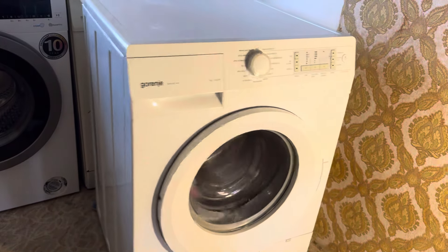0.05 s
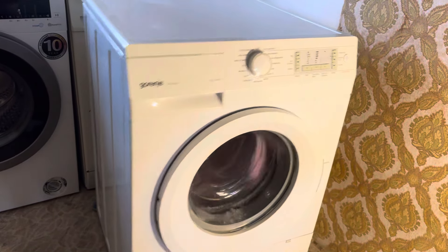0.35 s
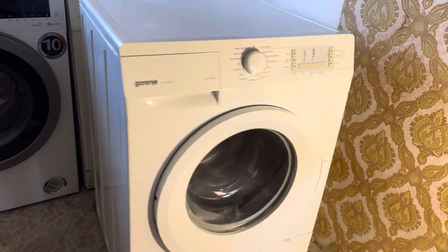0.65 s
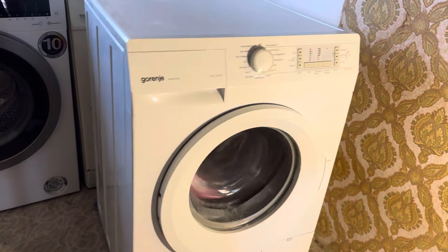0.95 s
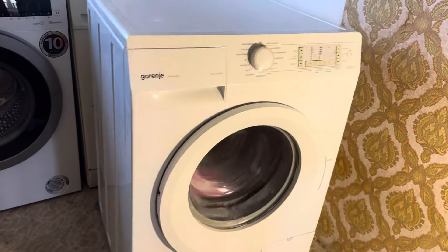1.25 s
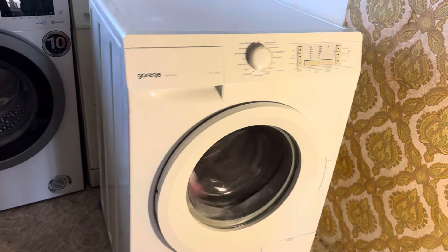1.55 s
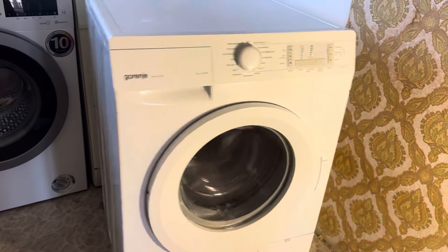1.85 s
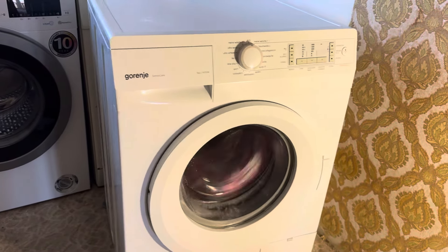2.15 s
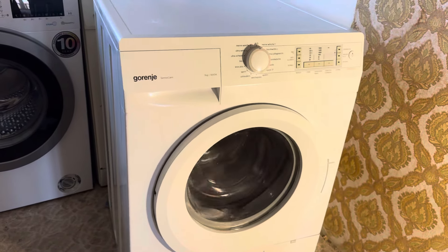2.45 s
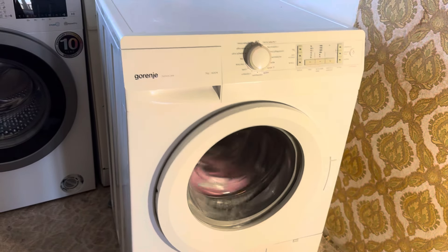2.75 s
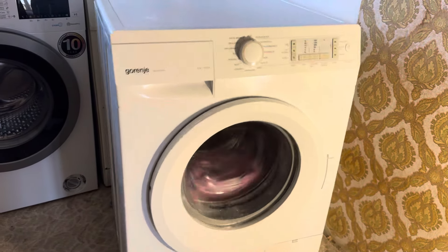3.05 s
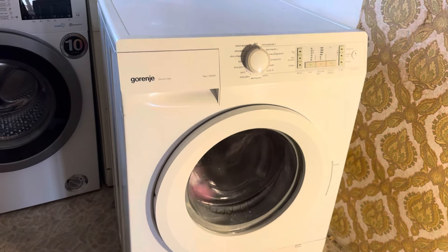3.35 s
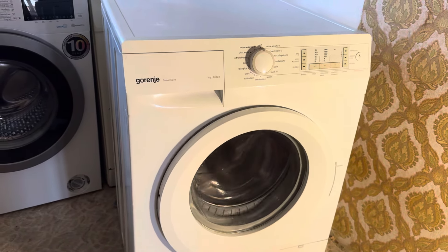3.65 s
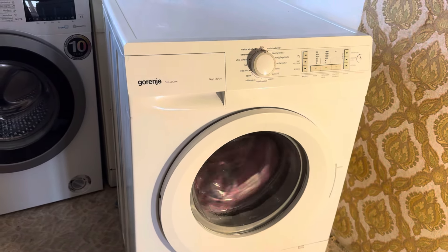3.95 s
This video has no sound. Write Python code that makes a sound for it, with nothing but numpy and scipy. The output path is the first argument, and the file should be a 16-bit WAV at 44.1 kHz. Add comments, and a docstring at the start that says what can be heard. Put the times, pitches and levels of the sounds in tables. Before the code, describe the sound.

A spinning washing machine thumps hard over a deep rumble, its knocks spreading out and fading.

```python
"""An unbalanced washing machine in a small hard room, on a closely spaced microphone pair.
At first it spins fast: over a deep rumble and a jingle of loose parts, the tub clacks against the
cabinet at every turn and bangs the sheet-metal panels. After two seconds the drum slows: the knocks
spread out, weaken and ring hollow, and the suspension squeaks and rubs. Last, a faint motor whine sinks."""
import sys
import numpy as np
from scipy import signal
from scipy.fft import rfft, irfft
from scipy.io import wavfile
from scipy.ndimage import uniform_filter1d

SR = 44100
rng = np.random.default_rng(int(sys.argv[2]) if len(sys.argv) > 2 else 0)


def dump(signal):
    """Clip the signal to [-1, 1] and save it as 16-bit WAV at the path in sys.argv[1]."""
    limited = np.clip(np.atleast_2d(signal).T, -1, 1)
    pcm = np.round(limited * 32767).astype(np.int16)
    wavfile.write(sys.argv[1], SR, pcm)


N = 176400
T = np.arange(N) / SR


def amp(db):
    """Decibels to gain."""
    return 10 ** (np.asarray(db) / 20)


def unit(x):
    """Scales to rms 1."""
    return x / np.sqrt(np.mean(x ** 2) + 1e-20)


def read(points, hz):
    """Reads a curve on a log-frequency axis."""
    f, value = np.transpose(points)
    return np.interp(np.log(hz + 1), np.log(f + 1), value)


def level(table, column=1):
    """Gain over time from a dB column."""
    columns = np.transpose(table)
    return amp(np.interp(T, columns[0], columns[column]))


def add(mix, s, sound):
    """Adds a sound at a time."""
    part = mix[max(round(s * SR), 0):][:len(sound)]
    part += sound[:len(part)]


def drift(hz):
    """Random wander of rms 1, mostly slower than hz."""
    lowpass = np.exp(-(np.fft.rfftfreq(N, 1 / SR) / hz) ** 2)
    return unit(irfft(rfft(rng.standard_normal(N)) * lowpass, N))


def colour(x, points, size=4096):
    """Causal filter of unit energy with the given spectrum."""
    log_gain = np.log(amp(read(points, abs(np.fft.fftfreq(size, 1 / SR)))))
    taps = np.fft.ifft(np.exp(np.conj(signal.hilbert(log_gain)))).real[:size // 2]
    return signal.oaconvolve(x, taps / np.linalg.norm(taps))[:N]


def ticks(per_s=650, spread_db=3):
    """Tiny impacts at random moments, a few of them stronger."""
    impulses = (rng.random(N) < per_s / SR) * rng.choice([-1, 1], N)
    return impulses * amp(spread_db * np.minimum(rng.exponential(1, N), 4))


def contacts(hits, rise_s, fall_s, chatter_db, chatter_s, grain):
    """Each (start_s, level_db) is a quick burst of tiny impacts followed by dying chatter."""
    t, out = T[:SR // 4], np.zeros(N)
    decay = np.exp(-t / fall_s) + amp(chatter_db) * np.exp(-t / chatter_s)
    shape = (1 - np.exp(-t / rise_s)) ** 2 * decay
    for s, db in hits:
        noise, clumps = rng.standard_normal((2, len(t)))
        burst = shape * noise * np.exp(grain * unit(uniform_filter1d(clumps, size=60)))
        add(out, s, amp(db) * burst * np.sqrt(SR / 100) / np.linalg.norm(burst))
    return out


def ringing(hits, modes, rise_s, detune):
    """Each (start_s, level_db) rings the modes, a little differently every time."""
    t, out = T[:SR // 2], np.zeros(N)
    hz, mode_db, t60 = np.transpose(modes)[:, :, None]
    fade = amp(mode_db - 60 * t / t60) * (1 - np.exp(-t / rise_s))
    for s, db in hits:
        offset, sign = rng.standard_normal((2, len(modes), 1))
        partials = np.sign(sign) * fade * np.sin(2 * np.pi * hz * (1 + detune * offset) * t)
        add(out, s, amp(db) * partials.sum(0))
    return out


# Cabinet shaking: time_s, rumble_db, rattle_db (levels in all tables are relative)
SHAKE = [(0, -16.5, -24), (.9, -16, -22), (1.65, -22, -25), (1.9, -21.5, -25.5), (2.15, -29, -41),
         (2.38, -29, -40), (2.5, -26.5, -37), (3.15, -25, -34), (3.4, -30, -42), (3.78, -35, -57),
         (3.9, -47.5, -62.5)]
# Spectra of the rumble and the rattle: freq_hz, level_db
RUMBLE_SPECTRUM = [(28, -58.5), (60, -20.5), (100, 1.5), (165, -2.5), (195, -21.5), (245, -11),
                   (330, -13.5), (450, -23.5), (15000, -82.5)]
RATTLE_SPECTRUM = [(150, -24), (260, -12), (550, -6), (1000, -9), (1900, -17), (4200, -35), (14000, -47)]
def shaking():
    """The cabinet rumbles and its loose parts rattle."""
    rumble = amp(-1) * unit(colour(rng.standard_normal(N), RUMBLE_SPECTRUM))
    rattle = amp(-4) * unit(colour(ticks(), RATTLE_SPECTRUM))
    return level(SHAKE, column=1) * rumble + level(SHAKE, column=2) * rattle


# Sway of the tub and boom of the cabinet: time_s, level_db
TUB_SWAY = [(0, -20), (.36, -9.5), (.9, -21.5), (1.35, -19), (1.6, -20), (2.05, -25), (4, -44)]
CABINET_BOOM = [(0, -17), (1.3, -16), (1.5, -18), (2.13, -17.5), (2.6, -28), (3.05, -19), (3.25, -26),
                (3.7, -30.5), (4, -48)]
def drone(curve, hz, wander_hz, flutter_db, gain_db):
    """A deep resonance of the machine, wavering in pitch and level."""
    cycles = np.cumsum(hz + wander_hz * drift(8)) / SR
    return level(curve) * amp(gain_db + flutter_db * drift(14)) * np.sin(2 * np.pi * cycles)


# Spectrum of small metal parts: freq_hz, level_db
JINGLE_SPECTRUM = [(1500, -10), (3300, 18), (7000, 8), (11000, 11.5), (15000, 3)]
def jingling(flare_s=0.07):
    """Small metal parts jingle while the shaking is hard, and flare up at every bang."""
    force = level(SHAKE, column=2)
    energy = (amp(4) * (force / force.max()) ** 2) ** 2
    for s, db, _ in BANGS:
        add(energy, s, (amp(db) * np.exp(-T / flare_s)) ** 2)
    return amp(-44.5) * np.sqrt(energy) * unit(colour(ticks(), JINGLE_SPECTRUM))


# Blows on the panels: start_s, bang_db, thud_db
BANGS = [(0.013, 0, 0), (.134, 1.5, -5.5), (.365, 1, -11), (0.502, -1, -1.5), (.624, 2, -7),
         (0.75, 1.5, -2), (0.893, 4.5, -5), (1.011, 0.5, -3), (1.142, 0, 0.5), (1.175, 4, -1),
         (1.29, 2, -16), (1.325, 1, -4), (1.347, -0.5, -9), (1.473, 3, 0.5), (1.502, 1.5, -8.5),
         (1.604, -1, 0), (1.644, 5, -3.5), (1.775, -6, -3), (1.807, 2.5, -4.5), (1.969, -5.5, -9.5),
         (2.44, -21.5, -8.5), (3.301, -6, -5.5)]
# Sharp contacts of the tub: start_s, level_db
CLACKS = [(.106, 2.5), (.251, 2), (.345, 1), (.493, 3.5), (.62, 4), (.727, 1.5), (.859, 6), (.998, 2),
          (1.032, 3.5), (1.139, 1), (1.178, 0), (1.289, 2), (1.325, -5), (1.348, 2), (1.441, 5.5),
          (1.603, 4), (1.773, 0.5), (1.81, -4), (2.056, -8.5), (2.127, -13.5), (2.868, -11), (3.14, -9.5),
          (3.81, -23)]
# Spectra of a bang and a clack: freq_hz, level_db
BANG_SPECTRUM = [(130, 0.5), (700, -0.5), (1200, -9), (1800, -9.5), (2800, -18), (4700, -25.5),
                 (11000, -29.5), (15000, -35)]
CLACK_SPECTRUM = [(100, 14.5), (600, 18.5), (1900, 6.5), (3200, 3.5), (5000, -6.5), (8000, -3.5),
                  (11000, -1.5), (15000, -6.5)]
def fast_blows():
    """The tub clacks against the cabinet and the panels crash."""
    clacks = contacts(CLACKS, rise_s=.0012, fall_s=.004, chatter_db=-24, chatter_s=.04, grain=.5)
    bangs = contacts([(s, db) for s, db, _ in BANGS],
                     rise_s=.0009, fall_s=.01, chatter_db=-19, chatter_s=.039, grain=.26)
    return amp(-23) * colour(clacks, CLACK_SPECTRUM) + amp(-16.5) * colour(bangs, BANG_SPECTRUM)


# Low cabinet modes: pitch_hz, level_db, t60_s
CABINET_MODES = [(88.75, 4, 0.39), (117.6, 4.5, 0.21), (148.14, -4.5, 0.69), (166.4, -8, 0.14),
                 (206.9, -9, 0.38), (245.9, -8, 0.52), (307.3, -5.5, 0.22)]
def thuds(bang_lag_s=.00633, knock_lag_s=.031):
    """Every bang and slow knock pushes the low modes of the cabinet."""
    hits = [(s + bang_lag_s, db) for s, _, db in BANGS]
    hits += [(s + knock_lag_s, db) for s, *_, db in KNOCKS]
    return amp(-15.5) * ringing(hits, CABINET_MODES, rise_s=.0033, detune=.024)


# Knocks of the slowing drum: start_s, clack_db, tub_ring_db, panel_db, thud_db
KNOCKS = [(2.32, -14.5, -20, -17, -15), (2.521, -10, -18, -10, -13), (2.735, -6, -29, -7, -9),
          (2.972, -2, -5.5, -6.5, -8), (3.264, -3.5, -1, -4, -6), (3.639, -9.5, -12, -10, -10)]
# Spectrum of the answering panel: freq_hz, level_db
PANEL_SPECTRUM = [(250, -9), (700, -3.5), (1100, -3.5), (2100, -8.5), (3200, -14.5), (4700, -24.5),
                  (14000, -30)]
PANEL_LAG_S = .0094
PANEL_HITS = [(s + PANEL_LAG_S, db) for s, _, _, db, _ in KNOCKS]
def slow_knocks():
    """A softer clack; a moment later the panel answers with a hollow knock."""
    clacks = contacts([(s, db) for s, db, *_ in KNOCKS],
                      rise_s=.0054, fall_s=.011, chatter_db=-48, chatter_s=.016, grain=.16)
    panel = contacts(PANEL_HITS, rise_s=.0012, fall_s=.004, chatter_db=-27, chatter_s=.02, grain=.45)
    return amp(-23) * colour(clacks, CLACK_SPECTRUM) + amp(-22) * colour(panel, PANEL_SPECTRUM)


# Modes of the tub and the hollow panel: pitch_hz, level_db, t60_s
TUB_MODES = [(2870, 0, .025), (3090, -4, .02)]
PANEL_MODES = [(670, -1, .09), (775, 1, .12), (900, 1, .11), (1090, -6, .08), (1880, -10, .06),
               (2330, -13, .06)]
# Light taps on the panel: start_s, level_db
TAPS = [(2.46, -16), (2.578, -14), (3.055, -9.5)]
def tub_and_panel_rings():
    """Each slow knock briefly rings the tub, then the hollow panel; light taps ring the panel alone."""
    tub = ringing([(s, db) for s, _, db, _, _ in KNOCKS], TUB_MODES, rise_s=.003, detune=.008)
    panel = ringing(PANEL_HITS + TAPS, PANEL_MODES, rise_s=.0018, detune=.025)
    return amp(-13) * tub + amp(-17.5) * panel


# Suspension squeaks and rubs: start_s, length_s, pitch_hz, waver_ratio, level_db
SQUEAKS = [(2.375, .05, 6150, .04, -48), (2.425, .05, 1150, .16, -37.5), (2.665, .035, 1780, .06, -38.5),
           (3.802, .022, 7240, .012, -48)]
def squeaks(octave_db=-14):
    """Stick-slip chirps with a weak octave; uneven slipping turns a whistle into a rub."""
    out, waver = np.zeros(N), drift(500)
    for s, length, hz, uneven, db in SQUEAKS:
        phase = 2 * np.pi * np.cumsum(hz * (1 + uneven * waver)) / SR
        swell = np.sin(np.pi * np.clip((T - s) / length, 0, 1))
        out += amp(db) * swell * (np.sin(phase) + amp(octave_db) * np.sin(2 * phase))
    return out


# Motor whine: time_s, pitch_hz, level_db
WHINE = [(3.25, 570, -39), (3.401, 520, -36.5), (3.7, 415, -65)]
def motor():
    """A faint whine sinks as the drum brakes."""
    s, hz, _ = np.transpose(WHINE)
    phase = 2 * np.pi * np.cumsum(np.interp(T, s, hz)) / SR
    return level(WHINE, column=2) * (T > s[0]) * (T < s[-1]) * np.sin(phase)


# Decay between the near, hard walls: freq_hz, t60_s
ROOM_DECAY = [(60, 0.38), (1000, 0.35), (11000, 0.37)]
def room(x, size=512, low_cut_hz=70.7):
    """Two diffuse tails: each band stores the energy it gets and gives it back as dying noise."""
    frames = dict(nperseg=size, noverlap=size * 3 // 4)
    hz, t, bands = signal.stft(x, SR, **frames)
    power = abs(bands) ** 2
    keep, stored = amp(-120 * t[1] / read(ROOM_DECAY, hz)), np.zeros_like(power)
    stored[:, :3] = power[:, :40].mean(1, keepdims=True)  # the room is already ringing
    for k in range(3, len(t)):
        stored[:, k] = keep * stored[:, k - 1] + (1 - keep) * power[:, k - 3]
    real, imag = rng.standard_normal((2, 2) + bands.shape)
    tails = signal.istft(np.sqrt(2 * abs(stored)) * (real + 1j * imag), SR, **frames)[1][:, :N]
    return signal.sosfilt(signal.butter(4, low_cut_hz, "high", fs=SR, output="sos"), tails)


# Likeness of the two microphones: freq_hz, coherence_ratio
MIC_COHERENCE = [(60, .98), (150, .94), (500, .72), (1000, .36), (4000, .15), (9000, .93)]
# Their balance: freq_hz, left_minus_right_db
MIC_BALANCE = [(200, .4), (550, -.9), (2200, 2.4), (8000, 0)]
# Their phase: freq_hz, left_lead_cycles
MIC_LEAD = [(500, 0), (8500, .12), (9550, .5), (12600, 1.5), (15600, 2.5)]
def microphones(middle, diffuse):
    """A close pair: alike in the bass, the left one slightly nearer the machine."""
    hz = np.fft.rfftfreq(2 * N, 1 / SR)
    coherence = np.clip(read(MIC_COHERENCE, hz), 0, 1)
    mid = rfft(middle, 2 * N) * np.sqrt((1 + coherence) / 2)
    side = rfft(diffuse, 2 * N) * np.sqrt((1 - coherence) / 2)
    lean = amp(read(MIC_BALANCE, hz) / 2) * np.exp(1j * np.pi * read(MIC_LEAD, hz))
    return irfft(np.array([(mid + side) * lean, (mid - side) / lean]))[:, :N]


def scene():
    """The machine and the room around it, from where the microphones stand."""
    clatter = fast_blows() + slow_knocks() + jingling() + squeaks()
    body = thuds() + shaking() + tub_and_panel_rings() + motor()
    sway = drone(TUB_SWAY, hz=39.8, wander_hz=1.7, flutter_db=.5, gain_db=-5)
    boom = drone(CABINET_BOOM, hz=65.3, wander_hz=3.5, flutter_db=4, gain_db=-2)
    direct = amp(-.5) * (clatter + body) + sway + boom
    wet, diffuse = room(clatter + amp(-1.5) * body)
    return microphones(direct + amp(-2) * wet, amp(1.5) * diffuse)


def record(dry, ceiling=.9, cutoff_hz=15800):
    """Soft overload, then the band limit."""
    limited = dry / (1 + abs(dry / ceiling) ** 6) ** (1 / 6)
    lowpass = signal.firwin(301, cutoff_hz, window=("kaiser", 8), fs=SR)
    return signal.oaconvolve(limited, lowpass[None], "same")


dry = scene()
out = record(dry)
dump(out)
```